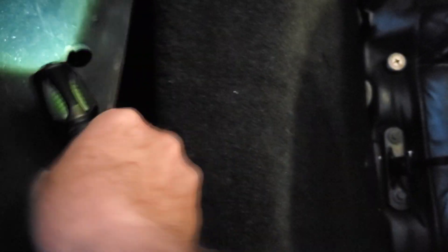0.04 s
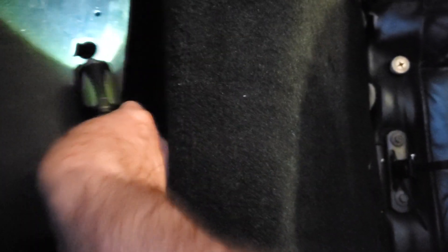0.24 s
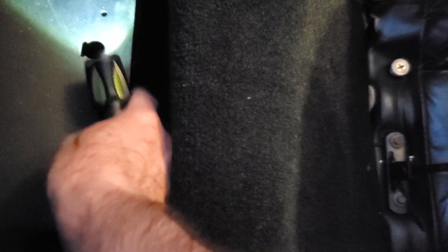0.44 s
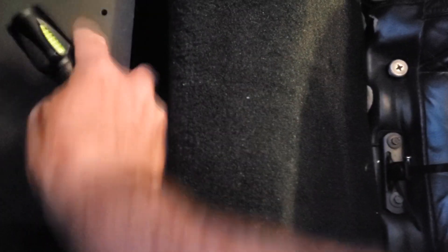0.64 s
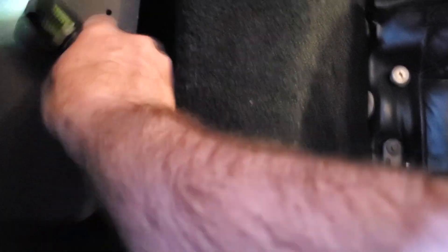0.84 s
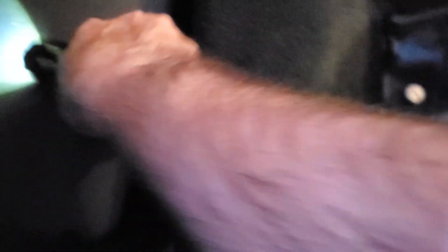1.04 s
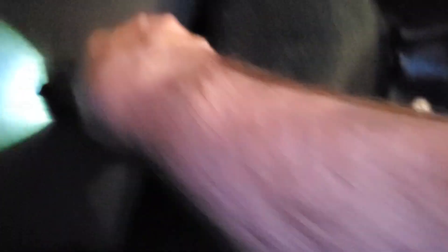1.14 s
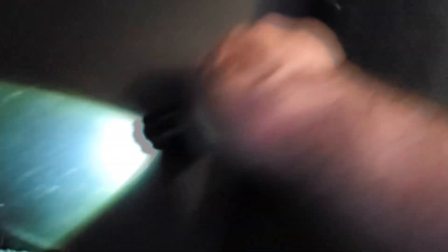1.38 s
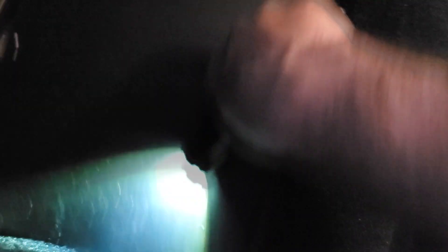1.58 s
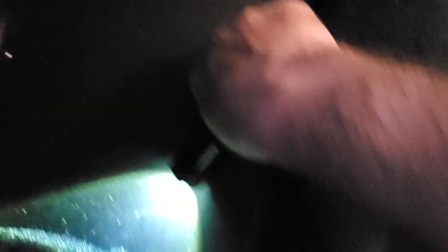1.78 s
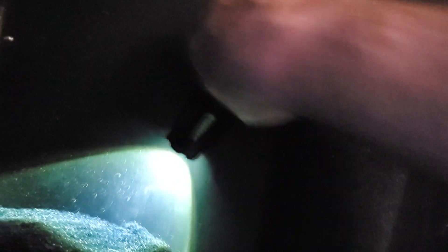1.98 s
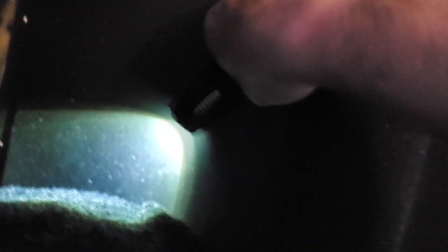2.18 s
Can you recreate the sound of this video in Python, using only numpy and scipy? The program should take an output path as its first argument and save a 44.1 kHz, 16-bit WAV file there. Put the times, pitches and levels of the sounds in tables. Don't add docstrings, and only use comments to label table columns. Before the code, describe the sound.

Irregular hard clacks and dull thuds of a loose car panel, with carpet scuffs and low booms.

```python
import sys
import numpy as np
from scipy import signal
from scipy.fft import rfft, irfft
from scipy.io import wavfile
from scipy.ndimage import uniform_filter1d, map_coordinates

SR = 44100
rng = np.random.default_rng(int(sys.argv[2]) if len(sys.argv) > 2 else 0)


def boost(x):
    u = np.asarray(x, float) / 20
    return 10 ** u


def master_out(mix):
    frames = np.transpose(np.atleast_2d(mix))
    ceiling = np.clip(frames, -1, 1)
    pcm = np.round(ceiling * 32767).astype(np.int16)
    wavfile.write(sys.argv[1], SR, pcm)


N = 97769

# (frequency [Hz], level [dB], t60 [s])
TUBE_MODES = [(1075, -1, 0.052), (550.5, -10.5, 0.07), (775, -9.5, 0.028), (933, -5.5, 0.052),
              (1271, -10, 0.046), (1602, -14.5, 0.037), (2030, -10.5, 0.028)]
MODE_SCATTER_DB = 2


def unit(x):
    return x / np.sqrt(np.mean(x ** 2))


def peak(x, db):
    return x * boost(db) / np.max(np.abs(x))


def add(out, x, start_s):
    i = int(start_s * SR)
    out[i:i + len(x)] += x[:len(out) - i]


def band(x, lo_hz, hi_hz):
    sos = signal.butter(2, [lo_hz, min(hi_hz, .45 * SR)], "bandpass", fs=SR, output="sos")
    return signal.sosfilt(sos, x)


def lowpass(x, hz, order):
    return signal.sosfilt(signal.butter(order, hz, fs=SR, output="sos"), x)


def highpass(x, hz, order):
    return signal.sosfilt(signal.butter(order, hz, "high", fs=SR, output="sos"), x)


def colour(shape, count=1):
    hz = np.maximum(np.fft.rfftfreq(N, 1 / SR), 1)
    shape_hz, shape_db = np.array(shape, float).T
    gain = boost(np.interp(np.log(hz), np.log(shape_hz), shape_db))
    white = rng.standard_normal((count, N))
    return unit(irfft(rfft(white) * gain, N))


def walk(rate):
    hold = max(int(SR / rate), 1)
    steps = np.repeat(rng.standard_normal(N)[:N // hold + 1], hold)
    return 1.112 * uniform_filter1d(steps, hold)[:N]


def ring(push, modes, scatter_db=0.):
    out, chance = 0, rng.standard_normal((len(modes), 2))
    for (hz, db, t60), (level_chance, pitch_chance) in zip(modes, chance):
        mode_hz = hz * (1 + .02 * scatter_db * pitch_chance)
        pole = np.exp(2j * np.pi * mode_hz / SR - np.log(1000) / (t60 * SR))
        out = out + boost(db + scatter_db * level_chance) * signal.lfilter([1], [1, -pole], push).imag
    return out


def floor():
    # (frequency [Hz], density [dB per Hz])
    floor_spectrum = [(18, -38), (30, -20), (75, 4), (134, -15.5), (199, -13.5), (280, -30.5), (1070, -36),
                      (7870, -55.5), (16000, -65)]
    mid, side = colour(floor_spectrum, count=2) * boost(-37)
    return mid, band(side, 330, 24000)


def boom():
    # (centre [s], length [s], level [dB], pitch [Hz])
    swells = [(0, 0.19, -27, 59.2), (0.2, 0.41, -32.5, 56), (0.343, 0.15, -20, 55.47),
              (0.483, 0.08, -26, 53.3), (0.638, 0.21, -37.5, 63.5), (0.752, 0.13, -21, 62.5),
              (0.977, 0.13, -26.5, 59.3), (1.05, 0.076, -20, 62.7), (1.182, 0.2, -32.5, 57.6),
              (1.314, 0.15, -25, 59.2), (1.467, 0.1, -16, 56.2), (1.553, 0.068, -19, 58.9),
              (1.619, 0.075, -28, 61.3), (1.771, 0.12, -24.5, 63.1), (1.875, 0.075, -27.5, 64.54),
              (2.009, 0.18, -28, 57), (2.178, 0.12, -19, 56.1)]
    t = np.arange(N) / SR
    centre_s, _, _, pitch_hz = np.array(swells, float).T
    hz = np.interp(t, centre_s, pitch_hz) * (1 + 0.0609 * walk(24.52))
    swell = 0
    for s, length, db, _ in swells:
        swell = swell + boost(db) * np.cos(np.pi * np.clip((t - s) / length, -.5, .5))
    flutter = boost(2.5 * walk(6.96))
    return np.sqrt(2) * swell * flutter * np.sin(2 * np.pi * np.cumsum(hz) / SR)


def scuffs():
    # (start [s], length [s], level [dB], treble [dB], tube [dB])
    rubs = [(-.05, 0.17, -48, 1, -44), (0.043, 0.32, -46, 1, -55), (0.189, 0.059, -55.5, -1, -59),
            (0.423, 0.044, -58.5, 7, -78), (0.523, 0.065, -54, 5, -57), (0.568, 0.16, -58, 3.5, -64),
            (0.739, 0.08, -65, 7, -60), (0.85, 0.11, -57, 7, -71), (0.913, 0.068, -50, 5.5, -52),
            (0.975, 0.15, -47, -2.5, -43.5), (1.089, 0.21, -47.5, 2, -36), (1.268, 0.19, -50, 7.5, -45.5),
            (1.455, 0.072, -42, 4.5, -51), (1.511, 0.1, -45, -4, -42), (1.581, 0.15, -42.5, -5, -36.5),
            (1.823, 0.034, -60, -1, -52), (1.868, 0.095, -70, 6.5, -85), (2.013, 0.073, -51.5, 4.5, -48.5),
            (2.134, 0.052, -56, 4.5, -43), (2.203, 0.1, -58.5, 11.5, -62), (0.318, .12, -62, 2, -68),
            (0.696, 0.22, -67, 5.5, -70), (1.647, 0.066, -50, -5, -41)]
    # (frequency [Hz], density [dB per Hz])
    rub_spectrum = [(80, -8.5), (190, -11.5), (300, -15.5), (1070, -18), (3600, -19), (7500, -35),
                    (12000, -37), (16000, -33)]
    split_hz, patch_db, grain_db, grains_per_s = 7200, 1, 1.5, 1100
    t = np.arange(N) / SR
    noise = colour(rub_spectrum)[0] * boost(grain_db * walk(grains_per_s))
    low = lowpass(noise, split_hz, 4) * boost(patch_db * walk(41.1))
    high = highpass(noise, split_hz, 4) * boost(patch_db * walk(30.2))
    tube = unit(ring(rng.standard_normal(N) * boost(2.5 * walk(45.1)), TUBE_MODES))
    out = 0
    for s, length, db, treble_db, tube_db in rubs:
        swell = np.sin(np.pi * np.clip((t - s) / length, 0, 1)) ** 0.78
        carpet = boost(db + 6.5) * (low + boost(treble_db) * high)
        out = out + swell * (carpet + boost(tube_db) * tube)
    return out


def songs():
    # (start [s], length [s], level [dB], pitch [Hz])
    sung_modes = [(0.0, .1, -39.5, 173.8), (.03, .05, -49, 1075), (.1, 0.16, -42, 181.5),
                  (.1, 0.18, -50, 1737), (.292, 0.032, -22, 1066), (.284, 0.027, -27, 2030),
                  (.53, 0.064, -55, 1067), (.655, 0.054, -56.5, 3030), (.665, 0.046, -55, 926),
                  (.735, 0.053, -52.5, 403), (.72, 0.098, -46, 187.4), (.762, 0.018, -60, 3290),
                  (.86, 0.087, -60, 2010), (.86, 0.043, -58, 3210), (.915, 0.052, -48, 2032),
                  (.925, .04, -48, 1074), (.9, 0.049, -49, 376), (1.0, 0.036, -45, 1065),
                  (1.038, 0.028, -33.5, 2030), (1.054, 0.039, -20, 1082), (1.055, .03, -31, 1640),
                  (1.058, 0.036, -31, 420), (1.122, 0.017, -44, 1100), (1.14, 0.028, -35, 1076),
                  (1.175, 0.063, -28, 1089), (1.17, 0.076, -40.5, 566), (1.215, .05, -37, 778),
                  (1.225, 0.054, -40, 1067), (1.17, .08, -50, 4250), (1.435, 0.027, -25, 745),
                  (1.628, .016, -29, 1246), (1.697, 0.054, -13.5, 150.8), (1.679, 0.041, -10.5, 118.7),
                  (1.682, 0.046, -22, 235), (2.04, .04, -41.5, 1075), (2.145, 0.038, -35.5, 395),
                  (.185, .035, -44, 2950), (.08, 0.078, -50, 4050), (.283, 0.014, -27.5, 3143),
                  (1.02, .03, -37.5, 1443), (1.057, .02, -32, 2000), (1.085, .04, -41, 1063),
                  (1.09, 0.044, -41.5, 779), (1.44, 0.053, -18.5, 104.4), (1.54, 0.026, -33, 756),
                  (1.593, .05, -16, 100), (1.7, 0.087, -29, 279.6), (.74, 0.082, -48.5, 249.5),
                  (1.63, .04, -42, 1740)]
    rise = 0.24
    out = np.zeros(N)
    drift, rough = 1 + 0.01 * walk(90), boost(4 * walk(160))
    for k, (s, length, db, hz) in enumerate(sung_modes):
        u = np.arange(int(length * SR)) / (length * SR)
        swell = np.sin(np.pi / 2 * np.minimum(u / rise, (1 - u) / (1 - rise)))
        at = (np.arange(len(u)) + k * (N // len(sung_modes))) % N
        tone = np.sin(2 * np.pi * np.cumsum(hz * drift[at]) / SR)
        add(out, np.sqrt(2) * boost(db) * swell * rough[at] * tone, s)
    return out


def thuds():
    # (time [s], level [dB], contact time [s])
    blows = [(0.001, -16.5, 0.0016), (0.145, -24.5, 0.00095), (0.295, -11, 0.0026), (0.308, -11.5, 0.0019),
             (1.023, -17, 0.0015), (1.058, -22, 0.0011), (1.433, -9.5, 0.0024), (1.445, -11, 0.0014),
             (1.459, -20, 0.00052), (1.538, -13, 0.00063), (1.551, -17.5, 0.0017), (1.594, -1.5, 0.001),
             (1.608, -7, 0.00075), (1.628, -9, 0.00046), (1.6804, -2.5, 0.0008), (1.684, -1, 0.00071),
             (1.699, -11, 0.0012), (1.717, -11, 0.0006), (1.837, -24, 0.0018), (1.895, -32, 0.0019),
             (2.046, -26, 0.0016), (2.065, -24, 0.00067), (2.148, -19.5, 0.001), (2.165, -22.5, 0.0012)]
    # (frequency [Hz], level [dB], t60 [s])
    panel_modes = [(100, -2, 0.15), (110.7, -1, 0.17), (147.9, 0.5, .22), (187, -7.5, 0.372),
                   (228.3, -1, 0.12), (284.3, -7, 0.14), (352.7, -6, 0.075), (410, -3.5, 0.07),
                   (511, -9, 0.072), (557, -4, 0.073), (636, -10, 0.069), (745, -8.5, 0.045)]
    shudder_db, shudder_t60_s = -6, 0.23
    out, t = np.zeros(N), np.arange(SR // 3) / SR
    for s, db, contact in blows:
        push = np.sin(np.pi * np.minimum(t / contact, 1))
        shudder = band(rng.standard_normal(len(t)), 89.6, 660) * boost(shudder_db - 60 * t / shudder_t60_s)
        add(out, peak(ring(push + shudder, panel_modes, MODE_SCATTER_DB), db + 0.5), s)
    return highpass(out, 86, 3)


def clacks():
    # (time [s], clack level [dB], bright tick level [dB], tube level [dB], crack t60 [s])
    contacts = [(0.2837, -8.5, -39.5, -27, 0.035), (0.2962, -9.5, -51.5, -28.5, 0.042),
                (1.019, -18.5, -30.5, -53, 0.063), (1.041, -28, -35.5, -35, 0.077),
                (1.0546, -11, -64.5, -23, 0.073), (1.1438, -36, -58, -43, 0.057),
                (1.1812, -42, -52, -47, 0.035), (1.4317, -8, -26.5, -28, 0.026),
                (1.4393, -7.5, -45, -30, 0.028), (1.4607, -18.5, -27.5, -39, 0.045),
                (1.4974, -46, -35, -42, 0.05), (1.5383, -21, -56.5, -29, 0.076),
                (1.5935, -12.5, -17, -26, 0.096), (1.6087, -15, -52, -40, 0.1),
                (1.6306, -16, -70, -31.5, 0.079), (1.6796, -10, -63, -38, 0.064),
                (1.6854, -15, -69, -39, 0.078), (1.7184, -20, -70.5, -54, 0.086),
                (2.0604, -36.5, -58, -35, 0.041), (2.1487, -40.5, -61, -38.5, 0.08),
                (2.1649, -35, -84, -50, 0.022)]
    # (frequency [Hz], level [dB], t60 [s])
    trim_modes = [(747, -2, 0.041), (1425, -7, 0.035), (1926, -6, 0.033), (2322, 0.5, 0.034),
                  (2880, 0, 0.018), (3330, -2.5, 0.032), (3793, -1.5, 0.023), (4342, -1, 0.027),
                  (4890, -5, 0.022), (6130, -8, 0.024)]
    crack_db, trim_db, sharp_db = 2.5, -1, 3.5
    sharp_t60_s, tick_t60_s = 0.0085, 0.021
    tube_hold_s, tube_rise_s = 0.01095, 0.0018
    hard_top_hz, hard_db_per_octave = 4770, 22.5
    out, t = np.zeros(N), np.arange(SR // 6) / SR

    def fall(t60):
        return boost(-60 * t / t60) * np.minimum(t / 0.00039, 1)

    for s, clack_db, tick_db, tube_db, t60 in contacts:
        rattle_noise, tick_noise, tube_noise = rng.standard_normal((3, len(t)))
        octaves = (tick_db - clack_db + 33.5) / hard_db_per_octave
        top_hz = np.clip(hard_top_hz * 2 ** octaves, 1000, 14000)
        decay = fall(t60) + boost(sharp_db) * fall(sharp_t60_s) + boost(-42) * fall(3 * t60)
        rattle = rattle_noise * decay
        crack = peak(band(rattle, 481, 5620), crack_db)
        trim = peak(ring(rattle, trim_modes, MODE_SCATTER_DB), trim_db)
        body = lowpass(crack + trim, top_hz, 3)
        tick = band(tick_noise * (fall(tick_t60_s) + fall(sharp_t60_s)), 5860, 18000)
        tube_push = np.clip(np.minimum(t, tube_hold_s - t) / tube_rise_s, 0, 1)
        tube = ring(tube_noise * tube_push, TUBE_MODES)
        add(out, boost(clack_db) * body + peak(tick, tick_db + 8) + peak(tube, tube_db + 10.5), s)
    return out


def cabin_tail(near):
    t60_s, level_db = 0.14, -12
    t = np.arange(SR // 5) / SR
    tails = band(rng.standard_normal((2, len(t))), 676, 12300) * boost(-60 * t / t60_s)
    tails = tails / np.sqrt(np.sum(tails ** 2, axis=1, keepdims=True))
    return signal.fftconvolve(near[None], tails, axes=1)[:, :N] * boost(level_db)


def ports(near):
    left_lead_s, left_db, left_treble_db, port_hz = 0.00016, 2.5, 7.5, 2250
    low = signal.sosfiltfilt(signal.butter(2, port_hz, fs=SR, output="sos"), near)
    late = map_coordinates(low, [np.arange(N) - left_lead_s * SR], mode="nearest")
    top = highpass(near, 10500, 2) * (boost(left_treble_db) - 1)
    left = low * boost(left_db / 2) + near - low + top
    right = late * boost(-left_db / 2) + near - low - top / 2
    return left, right


def scene():
    mid, side = floor()
    mid = mid + boom()
    near = clacks() + thuds() + scuffs() + songs()
    side = side + band(clacks() + scuffs(), 1900, 16000) * boost(-1.5)
    left, right = ports(near)
    return np.array([left + mid + side, right + mid - side]) + cabin_tail(near)


def top_cut(x):
    return signal.sosfilt(signal.butter(12, 16830, fs=SR, output="sos"), x)


def record(dry):
    x = highpass(dry, 50, 4)
    x = x - 0.36 * band(x, 6980, 9160)
    rounded = np.tanh(0.57 * x) / 0.62
    mix = signal.sosfilt(signal.ellip(7, .2, 58, 15750, fs=SR, output="sos"), rounded)
    return top_cut(mix)


dry = scene()
out = record(dry)
master_out(out)
```